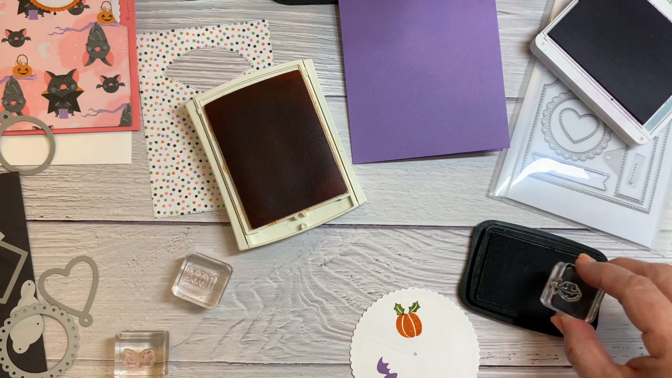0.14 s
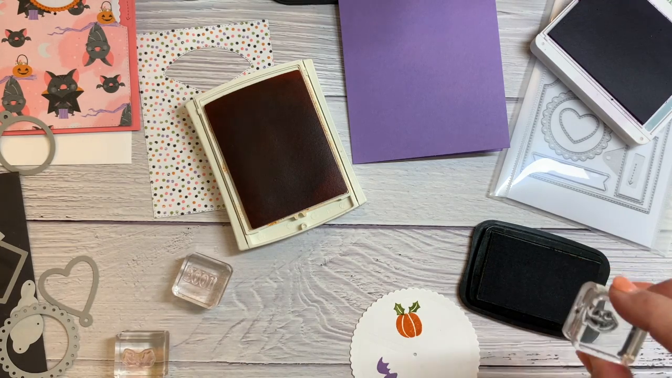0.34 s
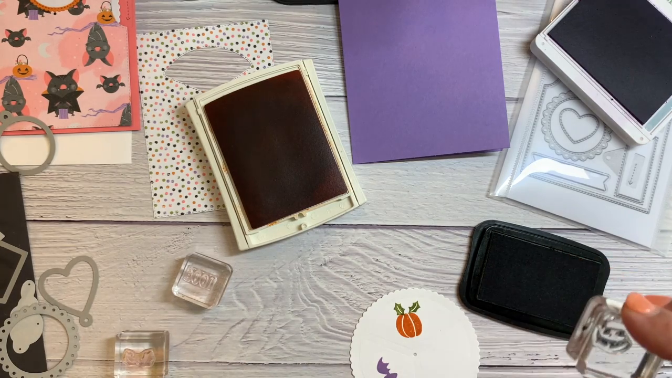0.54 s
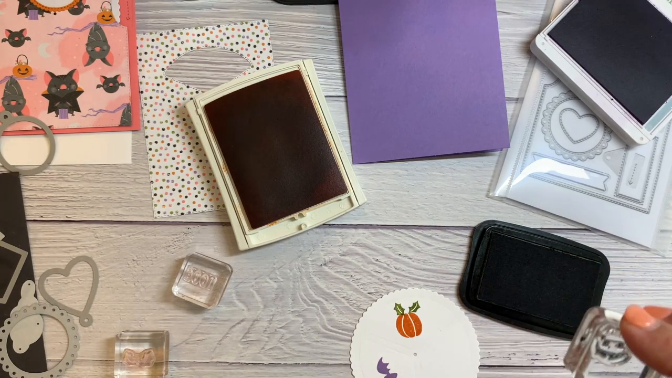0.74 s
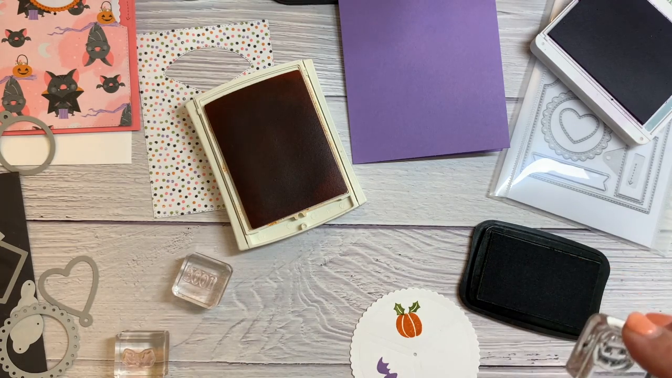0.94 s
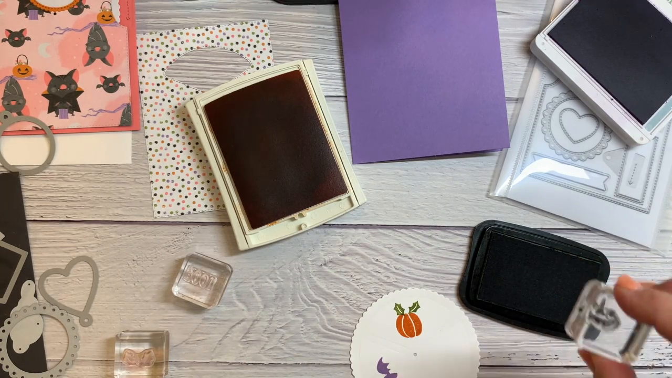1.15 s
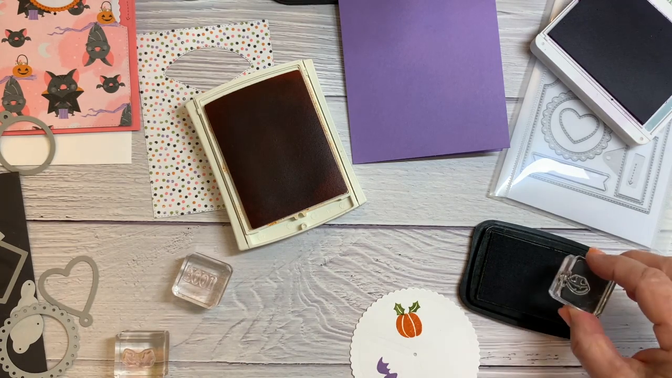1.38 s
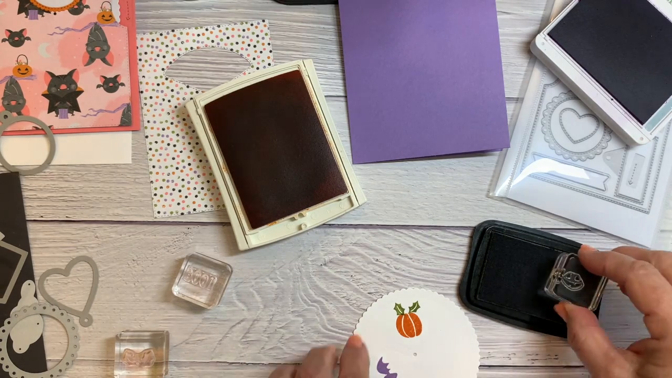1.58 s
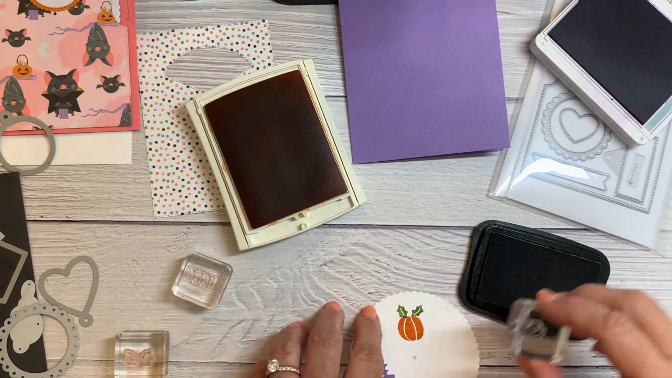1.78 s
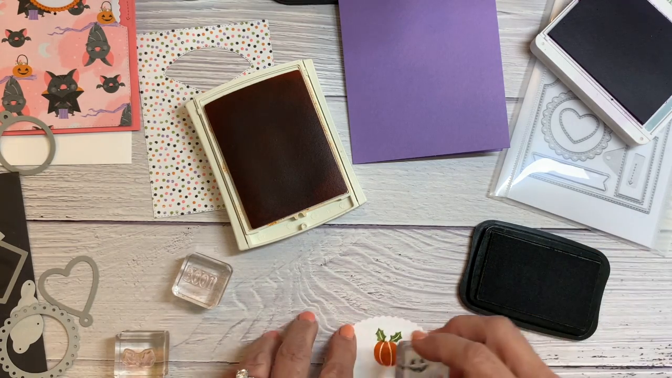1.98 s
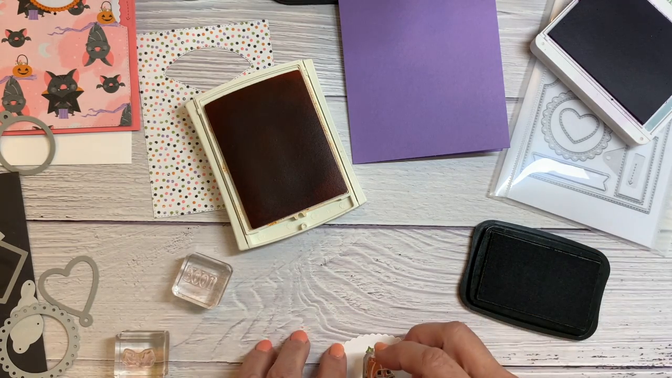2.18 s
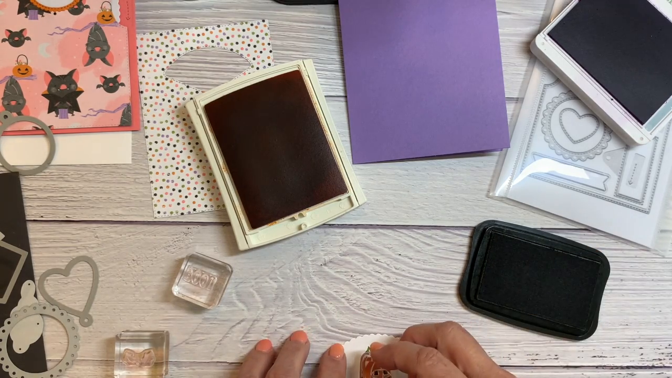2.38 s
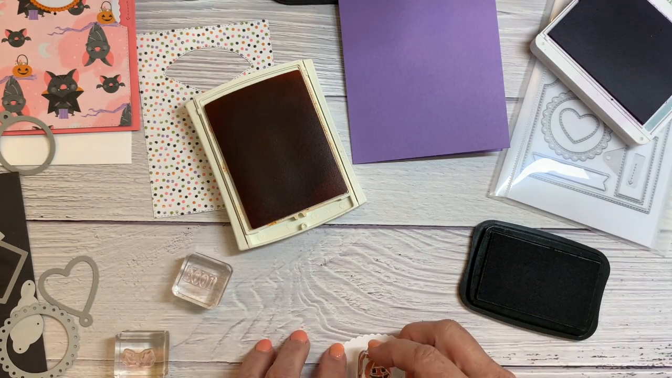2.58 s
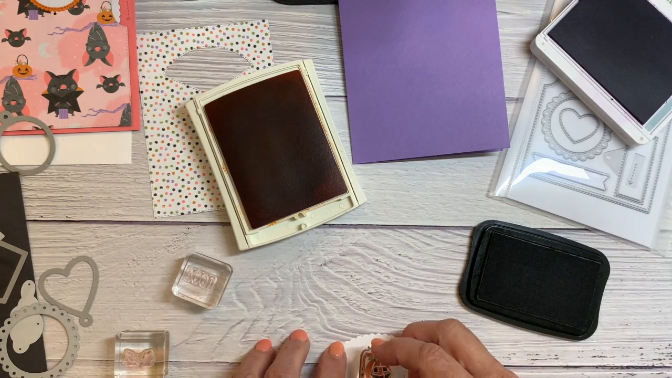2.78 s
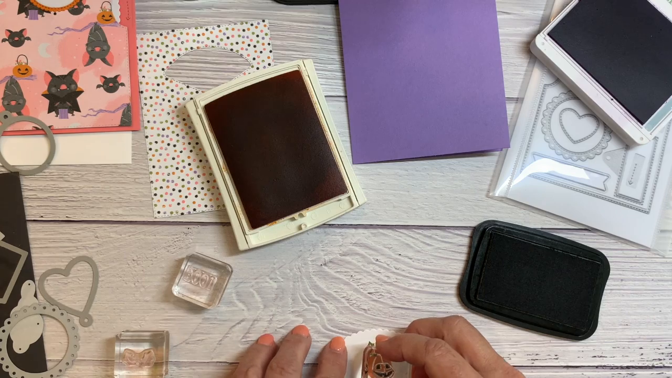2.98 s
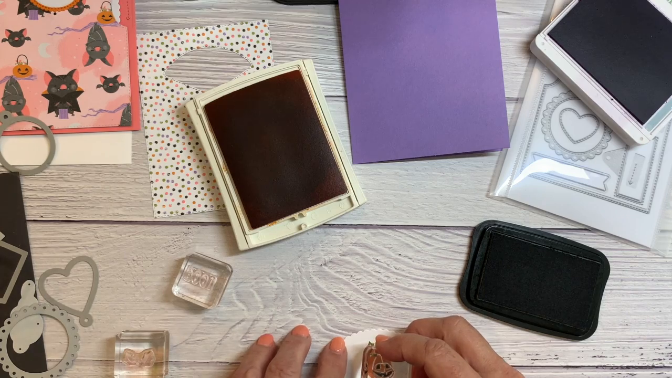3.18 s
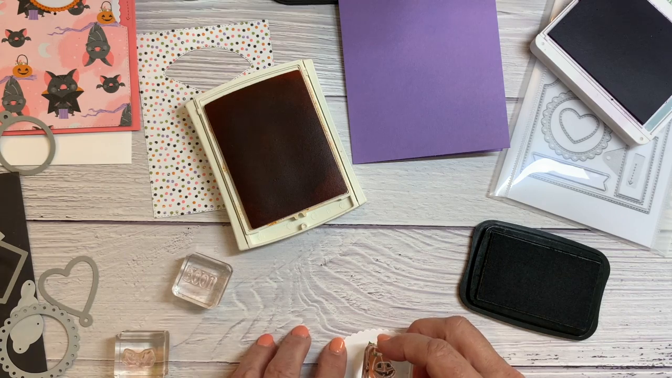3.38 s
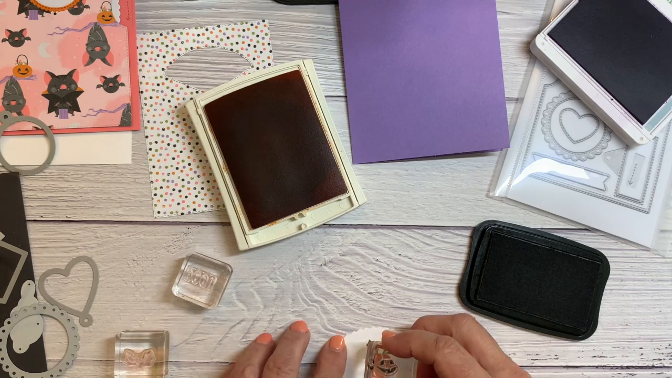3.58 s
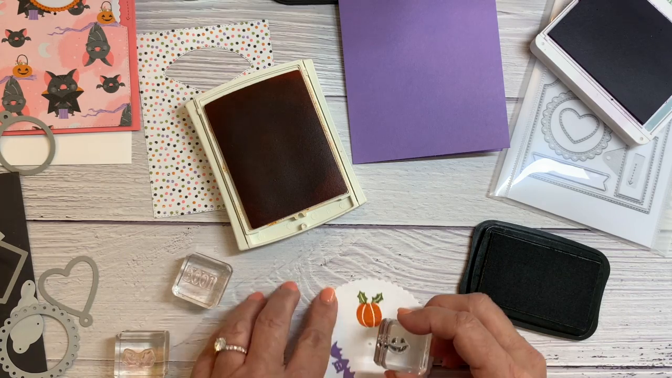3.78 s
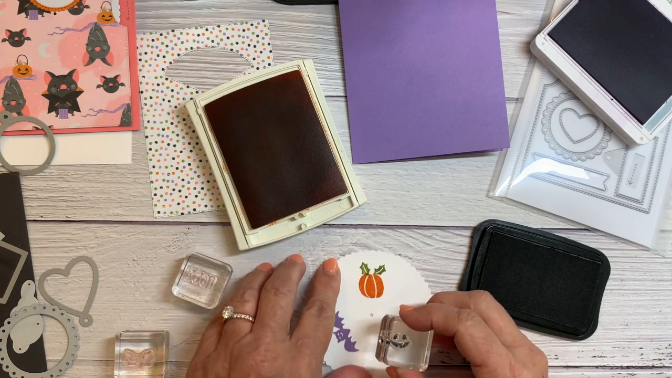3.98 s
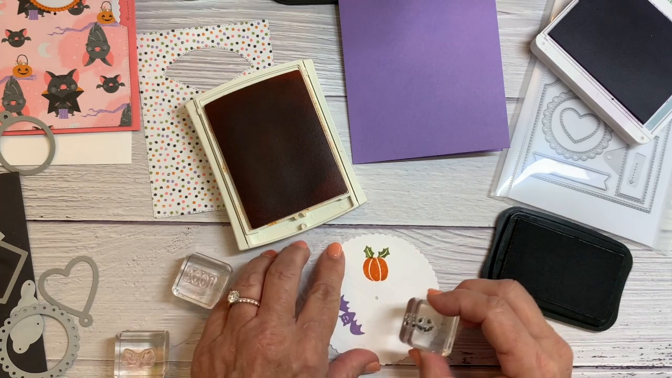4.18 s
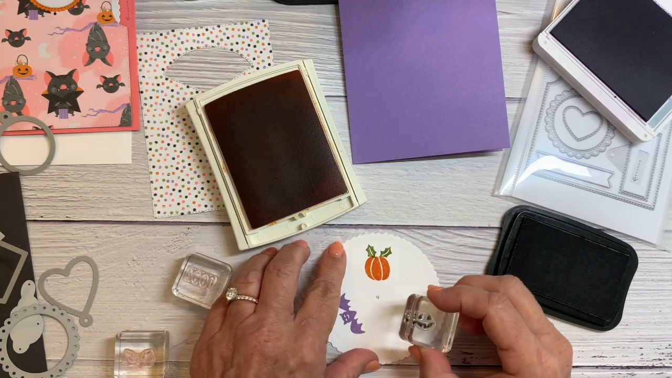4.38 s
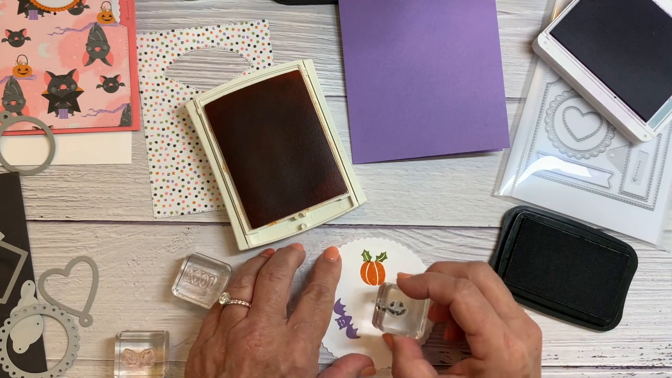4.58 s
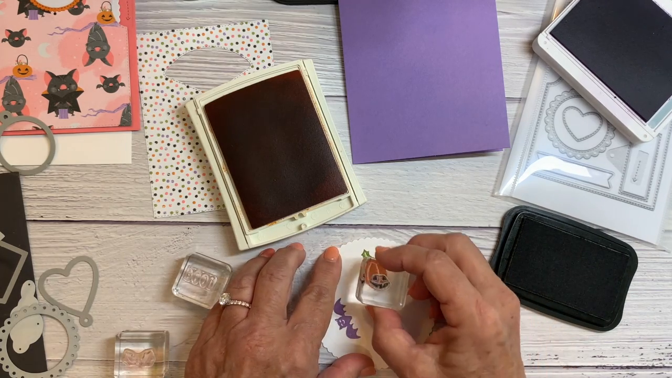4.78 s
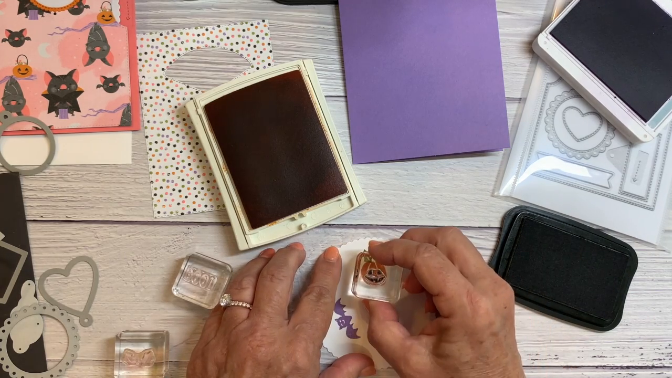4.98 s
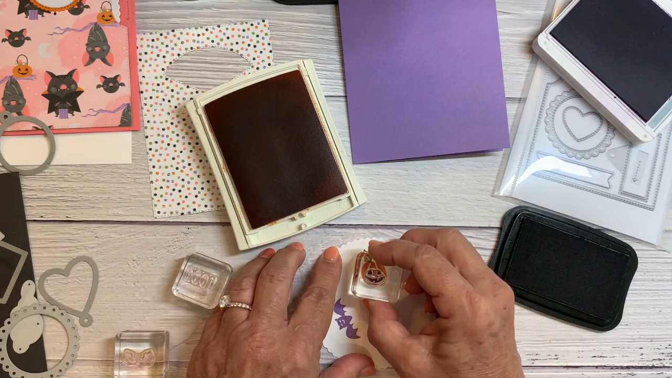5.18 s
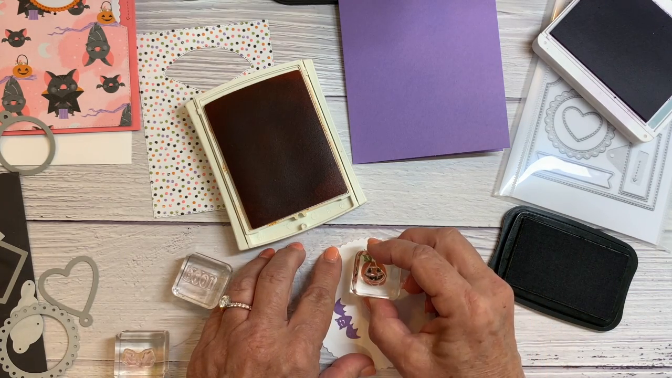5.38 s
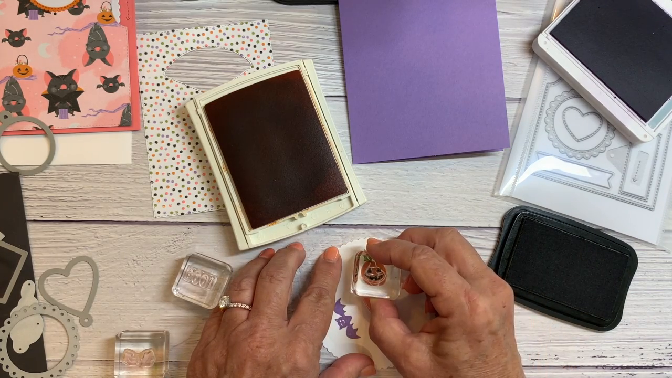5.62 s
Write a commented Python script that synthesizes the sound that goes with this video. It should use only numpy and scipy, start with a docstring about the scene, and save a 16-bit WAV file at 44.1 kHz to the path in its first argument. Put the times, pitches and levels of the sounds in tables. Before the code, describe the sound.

Close stereo view of a craft table in a small quiet room. A clear stamp block thuds on an ink pad at the very start, then twice more mid-way, the last softer. Faint finger rubbing and muffled hand bumps follow as it is pressed on card. Later the card slides with a hiss, the block's edge skids and knocks hard with a tiny chatter, and soft scuffs trail into faint hum.

```python
"""Stamp block, ink pad and card

An acrylic stamp block is tapped on an ink pad on a hollow tabletop: struck modes of table, hollow and case.
It is pressed on card, which is slid round: tiny slips stir resonances, and shaped noise hisses and sizzles.
The block's edge skids, then knocks down on the table and chatters; hands bump the top and small edges tick.
A small, quiet room adds echo, mains hum, a wandering rumble and two faint, far squeals of gliding pitch.
Two closely spaced microphones hear it, the right one slightly later."""
import sys
import numpy as np
from scipy import signal
from scipy.fft import rfft, irfft, next_fast_len
from scipy.io import wavfile

SR = 44100
rng = np.random.default_rng(int(sys.argv[2]) if len(sys.argv) > 2 else 0)


def unload_audio(sound):
    """Save the sound as a 16-bit wav file, at the path given as the first command line argument."""
    columns = np.transpose(np.atleast_2d(sound))
    # keep every value between -1 and 1, then stretch to whole-number steps
    steps = np.round(np.clip(columns, -1, 1) * 32767)
    wavfile.write(sys.argv[1], SR, steps.astype(np.int16))


N = 249145
TIME = np.arange(N) / SR

# Resonances of the tabletop; taps shift the pitch: f/Hz, level/dB, t60/s, left minus right/dB
TABLE_MODES = [(65.6, -28, 0.3, 0), (109.5, -28.5, 0.34, -1.5), (152.3, -26, 0.31, -2),
               (179.1, -17.5, 0.21, -4), (208.5, -5, 0.032, -4.5), (214.7, -32, 0.38, 1.5),
               (254, -24, 0.21, 1), (298.4, -13, 0.051, -3), (357, -27.5, 0.18, -9), (390, -13, 0.035, -3)]
# Hollow under the ink pad; taps shift the pitch: f/Hz, level/dB, t60/s, left minus right/dB
HOLLOW_MODES = [(478, -20.5, 0.07, -9.5), (489, -30.5, 0.06, 15)]
# The pad's case: f/Hz, level/dB, t60/s, left minus right/dB
CASE_MODES = [(715, -11, 0.032, 0.5), (756, -19, 0.059, -1), (822, -16.5, 0.048, -9.5),
              (926, -12.5, 0.045, 3), (1014, -13.5, 0.051, 5), (1213, -10, 0.045, -5), (1490, 4, 0.013, -1),
              (1530, -13.5, 0.057, -1), (1710, -14, 0.053, -2), (2033, -6.5, 0.016, -9),
              (2300, -12.5, 0.023, -4), (2540, -14, 0.016, -7), (2930, -6, 0.011, 1),
              (4280, 4.5, 0.0018, -15)]
# Block and table together: f/Hz, level/dB, t60/s, left minus right/dB
BLOCK_MODES = [(316, -12.5, 0.04, -5), (366, -17, 0.044, -2), (638, -32.5, .1, -1), (708, -25, 0.09, -4.5),
               (902, -32, 0.067, 0.5), (1007, -31.5, 0.11, 3), (1300, -1, 0.013, 4),
               (1290, -29.5, 0.11, -1), (1450, 1, 0.0115, -4.5), (1535, -29.5, 0.048, 1.5),
               (1663, -26, .07, 4), (1990, -29.5, .08, -4.5), (2130, -7, 0.013, -13),
               (2320, -19, 0.0135, -14), (2805, -16.5, 0.028, -0.5), (2960, -24.5, 0.034, -1.5),
               (3780, -21, 0.014, -9.5), (4500, -9, 0.0036, 4.5), (7640, -21, 0.004, 0),
               (10100, -20.5, 0.0063, 0.5)]
# Card and block held on the table: f/Hz, level/dB, t60/s, left minus right/dB
CARD_MODES = [(620, 2, 0.016, 1), (870, 7, 0.011, 3.5), (1300, -2.5, 0.011, -3), (1490, 2.5, 0.0054, 10),
              (2720, -14, 0.0093, -11), (3220, -16, 0.016, -2)]

# The block is tapped on the ink pad: t/s, landing level/dB, landing contact/s,
# squeeze until it bottoms out/s, bottoming level/dB, clack level/dB, clack contact/s,
# first rattle level/dB, rattle contact/s, hollow level/dB, pitch ratio of the thud
TAPS = [(0.0, -19, 0.0021, 0.0059, -9, -36.5, 0.00012, -41.5, 0.0005, -49, 1.03),
        (1.5312, -12.5, 0.0032, 0.0068, -9.5, -25.5, 0.00041, -41.5, 0.00036, -19, 1.008),
        (1.748, -27, 0.0017, 0.0083, -17.5, -49.5, 0.00026, -50.5, 0.00023, -29, 1.07)]
# Sharp ticks of acrylic edges, tacky ink and card: t/s, level/dB, t60/s, lower edge f/Hz, upper edge f/Hz
TICKS = [(0.116, -64, 0.043, 4030, 8900), (1.5275, -48, 0.015, 2240, 5000),
         (1.7465, -47.5, 0.015, 6500, 15000), (1.7558, -46.5, 0.018, 7500, 15000),
         (1.773, -60, 0.025, 5000, 10500), (2.254, -61.5, 0.034, 7350, 12000),
         (3.635, -62, 0.017, 3500, 9000), (3.6412, -49, 0.012, 5000, 10100),
         (4.213, -23.5, 0.0025, 3950, 7910), (4.2242, -49, .015, 6000, 10030),
         (4.3721, -45.5, 0.0025, 2230, 5530)]
# Hands bump the tabletop softly: t/s, force level/dB, contact/s
BUMPS = [(0.131, -32, 0.003), (0.861, -49, 0.00038), (2.172, -43, 0.0005), (2.853, -41, 0.0011),
         (2.892, -27.5, 0.0042), (2.912, -28.5, 0.0051), (3.645, -29, 0.0027), (4.276, -38.5, 0.0013),
         (4.311, -41, .002)]
# The block touches the card lightly: t/s, force level/dB, contact/s
NUDGES = [(2.447, -57, 0.00034), (2.602, -61.5, 0.00019), (4.5699, -45.5, 0.000085), (4.5805, -57, 0.00016)]
# The bare block snaps down on the table and chatters as it settles: t/s, force level/dB, contact/s
KNOCKS = [(4.2130, -14.5, 0.000019), (4.2183, -42, 0.00013), (4.2237, -40.5, 0.000092),
          (4.231, -44.5, .00012), (4.2362, -45, .00015), (4.282, -53, 0.000089)]

# Block and fingertips rub and scuff under pressure: t/s, length/s, level/dB, centre f/Hz
RUBS = [(0.845, 0.075, -70, 440), (0.943, 0.42, -79.5, 850), (1.37, 0.074, -72, 530),
        (1.82, 0.61, -70, 1047), (2.029, 0.21, -63, 1460), (2.161, 0.16, -62, 1400),
        (2.28, 0.17, -70.5, 1450), (2.3, 0.29, -71, 520), (2.435, 0.049, -66, 1070),
        (2.58, 0.076, -67, 760), (2.736, 0.053, -66.5, 700), (2.822, 0.15, -69, 600),
        (2.84, 0.39, -78, 1730), (3.703, 0.92, -65, 1916), (4.087, 0.36, -57, 1660)]
# Resonances of block and card under the fingers: f/Hz, level/dB, t60/s
RUB_MODES = [(381.4, 1, .015), (533.6, -2, 0.035), (841, -8, 0.028), (1043, -10, 0.026),
             (1300, -13, 0.0096), (1494, -9.5, 0.024), (1695, -11.5, 0.034), (1933, -12, 0.00402)]
# Strokes of card and fingers: t/s, length/s, hiss level before SLIDE_LIFT_DB/dB, peak sizzle level/dB
SLIDES = [(1.155, 0.15, -83, -84), (1.8, 0.35, -69.5, -81), (2.06, 0.14, -75, -93), (3.609, 0.36, -65, -68),
          (3.678, 0.2, -92, -60), (3.789, 0.61, -76, -88.5), (4.134, 0.17, -61.5, -75.5),
          (4.404, 0.17, -78.5, -79), (4.55, 0.41, -74, -88)]
# Spectrum of the friction hiss: f/Hz, relative level/dB
SLIDE_COLOUR = [(100, 26), (250, 13), (700, -11), (1100, -1.5), (1900, 12.5), (3200, 5), (4500, 15),
                (7000, 10), (10500, 6), (12500, -3.5), (15500, -1)]
# Spectrum of the paper fibres' sizzle: f/Hz, relative level/dB
SIZZLE_COLOUR = [(2000, -31), (5500, -15.5), (7800, -3), (10500, 0.5), (12500, -15), (15000, -8)]
# How alike the friction is at the two microphones: f/Hz, likeness (0 to 1)
SLIDE_LIKENESS = [(150, 0.67), (700, 0.25), (2500, 0.07), (5000, 1), (12000, 1)]
# The tilted edge skids on the card with a thin, high hiss: t/s, length/s, level/dB
SKIDS = [(4.085, 0.21, -56.5)]
# Resonances of the skidding edge: f/Hz, width/Hz, relative level/dB
SKID_BANDS = [(5000, 1200, 2), (6284, 760, -5), (8370, 3560, -14.5)]

# A thin, faint squeal sounds twice, far off: t/s, length/s, level/dB, top f/Hz
SQUEALS = [(0.9, 0.268, -74.5, 1077), (3.038, 0.18, -73, 1076)]
# Path of the deep rumble's loudness: t/s, level/dB
RUMBLE = [(0.4, -73.5), (0.7, -57.5), (1.25, -63), (2.1, -60), (2.45, -67.5), (2.7, -70), (2.95, -64.5),
          (3.85, -63), (4.3, -80), (4.9, -62.5), (5.3, -66), (5.65, -64)]
# Mains hum: f/Hz, level/dB
HUM = [(59.6, -71), (119.6, -68.5), (298, -85.5)]
# Spectrum of the still air: f/Hz, relative level/dB
AIR_COLOUR = [(20, -11.5), (50, 0.5), (90, -10.5), (170, -10.5), (330, -25.5), (700, -29.5), (1300, -31.5),
              (2800, -40.5), (5500, -40), (9500, -39.5), (12500, -40), (16000, -46)]
# How alike the air is at the two microphones: f/Hz, likeness (0 to 1)
AIR_LIKENESS = [(60, 0.85), (130, 0.3), (300, 0.5), (700, 0), (3000, 0.26), (8000, 1)]
# Faint wavering in the room tone: f/Hz, width/Hz, relative level/dB
WAVER_BANDS = [(333, 83, 2), (481.5, 390, -6.5), (1064, 400, -5), (1496, 2200, -1.5)]

# Spectrum of the room's echo: f/Hz, relative level/dB
ROOM_COLOUR = [(60, -28.5), (180, -20.5), (400, -11.5), (800, -6.5), (1400, -12.5), (2400, -10.5),
               (6000, -13), (10000, -14), (14000, -22.5)]
# How alike the echo is at the two microphones: f/Hz, likeness (0 to 1)
ROOM_LIKENESS = [(130, 1), (300, 0.52), (700, 0.28), (1500, 0.15), (5000, 0.64)]
# Decay of the room's echo: f/Hz, t60/s
ROOM_T60 = [(100, 0.48), (500, 0.35), (2000, 0.36), (8000, 0.31), (16000, 0.2)]
# Left microphone's head start, as sound bends round the body holding the pair: f/Hz, lead/s
LEFT_LEAD = [(500, 0.00036), (1400, 0.000061), (3000, 0.000091), (5200, 0.0001), (8400, 0.00012),
             (12500, .00012)]

CLACK_LEAD_S = 0.0025   # the pad's case clacks this long before the table takes the load
BOTTOM_CONTACT_S, HOLLOW_CONTACT_S = 0.0025, 0.00051
RATTLE_GAP_S, RATTLE_LOSS_DB = 0.011, 4   # spacing and average loss from bounce to bounce
SCOOP_HZ, SCOOP_S, TOP_AT_S, SAG_HZ_PER_S2 = 250, 0.026, 0.09, 4000   # glide of the squeals
AIR_DB, SLIDE_LIFT_DB = -65.5, 8
TABLE_ROOM_DB, BLOCK_ROOM_DB, CASE_ROOM_DB = 0.5, -3.5, 0.5   # how strongly each body feeds the room
FACING_DB = -9   # extra direct sound of block and case
CUTOFF_HZ = 16200


def from_db(db):
    """Turns decibels into an amplitude factor."""
    return 10 ** (np.asarray(db) / 20)


def rms_one(x):
    """Scales a sound to an rms of 1."""
    return x / np.sqrt(np.mean(x ** 2) + 1e-20)


def at_hz(points, hz):
    """Reads a table on a log-frequency axis."""
    table_hz, values = np.array(points).T
    return np.interp(np.log(np.maximum(hz, 1)), np.log(table_hz), values)


def fade(t, t60):
    """Falls by 60 dB in t60."""
    return np.exp(-np.log(1000) * t / t60)


def panned(x, pan_db):
    """Splits a level difference, left minus right, between the two sides."""
    return x * from_db([[pan_db / 2], [-pan_db / 2]])


def add(track, s, sound):
    """Lays a sound into a track at time s, or at the very start if s is negative."""
    start = max(round(s * SR), 0)
    track[start:start + len(sound)] += sound[:N - start]


def convolve(x, response):
    """Lets each sample of x set off the response, cut to the scene's length."""
    return signal.fftconvolve(np.atleast_2d(x), response, axes=1)[:, :N]


def drift(rate):
    """Smooth chance with spread 1, joining `rate` random points per second."""
    knots = rng.standard_normal(N)
    return rms_one(np.interp(TIME * rate, np.arange(N), knots))


def stereo_noise(colour, likeness, size=N):
    """Noise of a given spectrum, partly shared by the two microphones."""
    padded = next_fast_len(size)
    hz = np.fft.rfftfreq(padded, 1 / SR)
    mid, side = rfft(rng.standard_normal((2, padded)))
    alike = np.clip(at_hz(likeness, hz), -1, 1)
    shared = np.sqrt((1 + alike) / 2) * mid
    opposed = np.sqrt((1 - alike) / 2) * side * [[1], [-1]]
    return irfft((shared + opposed) * from_db(at_hz(colour, hz)), padded)[:, :size]


def uneven_noise(resonances, swing_db, swing_rate):
    """Noise in a few resonances, each swelling and sinking on its own; rms 1."""
    out = 0
    for hz, width_hz, db in resonances:
        edges = [max(hz - width_hz / 2, 20), hz + width_hz / 2]
        band = signal.butter(2, edges, "band", fs=SR, output="sos")
        shared, side = rms_one(signal.sosfilt(band, rng.standard_normal((2, N))))
        pair = shared + side * [[0.5], [-0.5]]
        out = out + pair * from_db(db + swing_db * drift(swing_rate))
    return rms_one(out)


def strokes(rows, steepness):
    """Speed rises and falls in one arch; loudness is a power of it, and overlaps add in energy."""
    power = 0
    for start_s, length_s, db in rows:
        speed = np.sin(np.pi * np.clip((TIME - start_s) / length_s, 0, 1))
        power = power + (from_db(db) * np.abs(speed) ** steepness) ** 2
    return np.sqrt(power)


def struck(blows, modes, build_cycles):
    """Rounded force pulses ring the body's modes: the longer the contact, the duller the sound."""
    t = TIME[:SR // 2]
    force = np.zeros(N)
    for s, force_db, contact_s in blows:
        pulse = t * np.exp(-np.pi * (t / contact_s) ** 2)
        add(force, s, from_db(force_db) * pulse / (pulse.sum() + 1e-20))
    ringing = 0
    for hz, db, t60, pan_db in modes:
        swell = 1 - np.exp(-(hz * t / build_cycles) ** 2)   # slow bending waves: low modes speak later
        tone = from_db(db) * np.sin(2 * np.pi * hz * t) * swell * fade(t, t60)
        ringing = ringing + panned(tone, pan_db)
    return convolve(force, ringing)


def room_tone(waver_db=-0.5, bands_db=-79.5, pan_db=-1.04):
    """Still air, faint hiss, a wavering middle range and mains hum."""
    air = from_db(AIR_DB) * rms_one(stereo_noise(AIR_COLOUR, AIR_LIKENESS))
    middle = from_db(bands_db) * uneven_noise(WAVER_BANDS, swing_db=4.0, swing_rate=25)
    hum = 0
    for hz, db in HUM:
        level = np.sqrt(2) * from_db(db + waver_db * drift(14.0))   # root 2 turns rms into peak
        hum = hum + level * np.sin(2 * np.pi * (hz * TIME + rng.random()))
    return panned(air + middle + hum, pan_db)


def rumble(low_hz=46, high_hz=88):
    """A deep band of noise swells and sinks in the room."""
    band = signal.butter(2, [low_hz, high_hz], "band", fs=SR, output="sos")
    settled = signal.sosfilt(band, rng.standard_normal(N + SR))[SR:]
    return rms_one(settled) * from_db(np.interp(TIME, *np.transpose(RUMBLE)))


def tapping(count=6, rattle_spread_db=3.0):
    """A tap clacks the pad's case, lands, bottoms out and rattles the case; gives thud and case sound."""
    thud, clacks = 0, []
    for (s, land_db, land_contact_s, squeeze_s, bottom_db, clack_db, clack_contact_s,
         rattle_db, rattle_contact_s, hollow_db, pitch) in TAPS:
        table = [(hz * pitch, *rest) for hz, *rest in TABLE_MODES]
        hollow = [(hz * pitch, *rest) for hz, *rest in HOLLOW_MODES]
        landing = (s, land_db, land_contact_s)
        bottoming = (s + squeeze_s, bottom_db, BOTTOM_CONTACT_S)
        thud = thud + struck([landing, bottoming], table, build_cycles=0.12)
        thud = thud + struck([(s, hollow_db, HOLLOW_CONTACT_S)], hollow, build_cycles=0.37)
        clacks.append((s - CLACK_LEAD_S, clack_db, clack_contact_s))
        for k in range(count):   # the loose case bounces on
            bounce_s = s + squeeze_s + RATTLE_GAP_S * (k + rng.uniform(0, 0.5))
            bounce_db = rattle_db - RATTLE_LOSS_DB * k + rattle_spread_db * rng.standard_normal()
            clacks.append((bounce_s, bounce_db, rattle_contact_s))
    return thud, struck(clacks, CASE_MODES, build_cycles=1.12)


def ticks(snap_db=18, top_hz=13500):
    """Tiny cracks: one sharp snap, then a burst of treble that dies within 50 ms."""
    t, out = TIME[:SR // 10], np.zeros(N)
    for s, db, t60, low_hz, bright_hz in TICKS:
        band = signal.butter(1, [low_hz, bright_hz], "band", fs=SR, output="sos")
        crack = from_db(snap_db) * (t == 0) + rng.standard_normal(len(t)) * fade(t, t60)
        add(out, s, from_db(db) * signal.sosfilt(band, crack))
    return signal.sosfilt(signal.butter(3, top_hz, fs=SR, output="sos"), out)


def bumping():
    """Soft hands give the tabletop rounded pushes that ring its modes."""
    return struck(BUMPS, TABLE_MODES, build_cycles=0.47)


def pressing(slips_per_s=2500, width_octaves=0.3, swing_db=3, swing_rate=35, spread_db=2):
    """The pressed block creeps on the card: dense tiny slips stir resonances that swell and sink."""
    t = TIME[:SR // 8]
    effort = np.array([strokes([row[:3]], steepness=0.93) ** 2 for row in RUBS])
    centres = np.array(RUBS)[:, 3]
    out = 0
    for hz, db, t60 in RUB_MODES:
        # a rub drives most the resonances near its own centre
        share = 1 / (1 + (np.log2(hz / centres) / width_octaves) ** 2)
        slips = (rng.random(N) < slips_per_s / SR) * rng.standard_normal(N)
        ring = t * np.sin(2 * np.pi * hz * t) * fade(t, t60)
        creak = rms_one(convolve(slips, [ring]))
        level = np.sqrt(share @ effort) * from_db(db + swing_db * drift(swing_rate))
        out = out + panned(creak * level, spread_db * rng.standard_normal())
    return out


def squeals(wobble_hz=11, wobble_rate=70, shimmer_db=2.2, shimmer_rate=45):
    """A nearly pure, unsteady tone scoops up to its top pitch, then sags ever faster."""
    out = 0
    for start_s, length_s, db, top_hz in SQUEALS:
        t = np.clip(TIME - start_s, 0, length_s)
        scoop = SCOOP_HZ * np.exp(-(t / SCOOP_S) ** 2)
        sag = SAG_HZ_PER_S2 * (t - TOP_AT_S) ** 2
        hz = top_hz - scoop - sag + wobble_hz * drift(wobble_rate)
        level = strokes([(start_s, length_s, db)], steepness=0.4)
        shimmer = from_db(shimmer_db * drift(shimmer_rate))
        out = out + level * shimmer * np.sin(2 * np.pi * np.cumsum(hz) / SR)
    return panned(out, pan_db=2.0)


def sliding_card(grain_db=1.0, grain_rate=400, flutter_db=1.67, flutter_rate=28, grit_db=-1.0, grit_rate=900):
    """Paper fibres rub on the table: hiss follows the hand, and gritty sizzle favours the fastest part."""
    rows = np.array(SLIDES)
    hiss = rms_one(stereo_noise(SLIDE_COLOUR, SLIDE_LIKENESS)) * strokes(rows[:, :3], steepness=1.0)
    hiss = hiss * from_db(SLIDE_LIFT_DB + grain_db * drift(grain_rate))
    grit = from_db(grit_db * drift(grit_rate))
    sizzle = rms_one(stereo_noise(SIZZLE_COLOUR, SLIDE_LIKENESS) * grit)
    sizzle = sizzle * strokes(rows[:, [0, 1, 3]], steepness=1.49)
    return (hiss + sizzle) * from_db(flutter_db * drift(flutter_rate))


def nudging():
    """Light touches of the block ring the damped modes of card and block."""
    return struck(NUDGES, CARD_MODES, build_cycles=0.76)


def skidding():
    """The tilted block's edge slips on the card: uneven, resonant hiss rises and falls with its speed."""
    return strokes(SKIDS, steepness=2.1) * uneven_noise(SKID_BANDS, swing_db=6.5, swing_rate=150)


def knocking():
    """Hard, very short contacts ring block and table together, bright and dry."""
    return struck(KNOCKS, BLOCK_MODES, build_cycles=1.4)


def room(x, early_db, early_t60=0.075, gap_s=0.00028):
    """Things on the table scatter sound at once; walls keep it a little longer, high treble dying first."""
    t = TIME[:SR // 2]
    echoes = rfft(stereo_noise(ROOM_COLOUR, ROOM_LIKENESS, size=len(t)))
    hz = np.fft.rfftfreq(len(t), 1 / SR)
    octave = np.round(np.log2(np.maximum(hz, 64)))
    tail = 0
    for k in np.unique(octave):
        walls = fade(t, at_hz(ROOM_T60, 2 ** k))
        scatter = from_db(early_db) * fade(t, early_t60)
        tail = tail + irfft(echoes * (octave == k), len(t)) * (walls + scatter)
    unit_energy = np.sqrt(np.sum(fade(t, at_hz(ROOM_T60, 1000)) ** 2))
    return convolve(x, tail * (t > gap_s) / unit_energy)


def microphones(pair):
    """The right microphone hears everything a moment after the left, by a lag that varies with pitch."""
    size = next_fast_len(N + SR // 10)
    hz = np.fft.rfftfreq(size, 1 / SR)
    lag = np.exp(-2j * np.pi * hz * at_hz(LEFT_LEAD, hz))
    later = irfft(rfft(pair[1], size) * lag, size)
    return np.array([pair[0], later[:N]])


def scene():
    """Contacts with their echo, friction on the card, the far squeals, the room tone and the rumble."""
    thud, case = tapping()
    table = -(thud + bumping())   # the top is pushed away from the microphones
    block = knocking()
    small = nudging() + ticks() + squeals()
    bodies = from_db(CASE_ROOM_DB) * case + from_db(TABLE_ROOM_DB) * table + from_db(BLOCK_ROOM_DB) * block
    echo = room(small + bodies, early_db=10.5)
    # block and case lie right under the microphones and beam straight up at them
    facing = from_db(FACING_DB) * (block + case)
    friction = panned(sliding_card() + pressing() + skidding(), pan_db=-0.5)
    contacts = small + case + table + block + facing + echo
    return microphones(contacts + friction + room_tone() + rumble())


def record(dry, low_cut_hz=54):
    """The microphones lose the deepest bass; the top is cut."""
    thin = signal.sosfilt(signal.butter(3, low_cut_hz, "high", fs=SR, output="sos"), dry)
    return signal.sosfilt(signal.ellip(10, 0.1, 80, CUTOFF_HZ, fs=SR, output="sos"), thin)


dry = scene()
out = record(dry)
unload_audio(out)
```